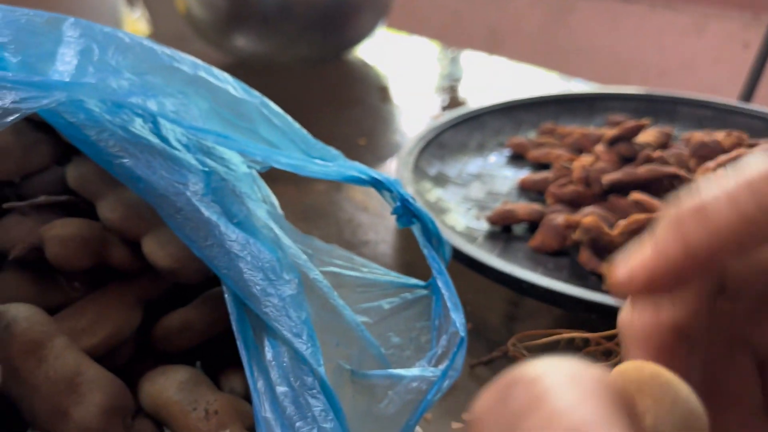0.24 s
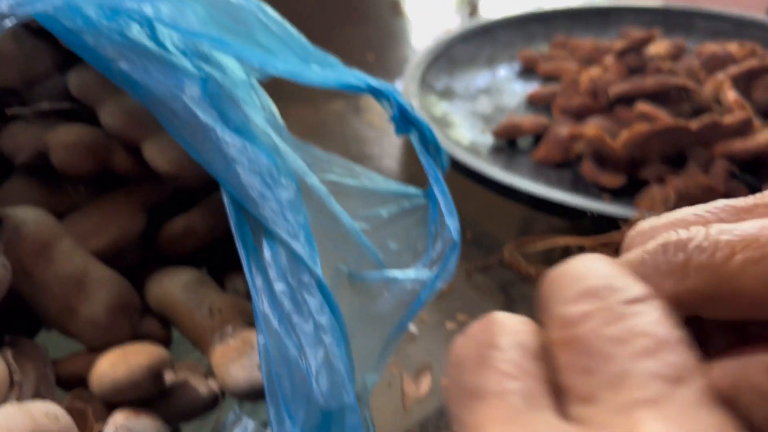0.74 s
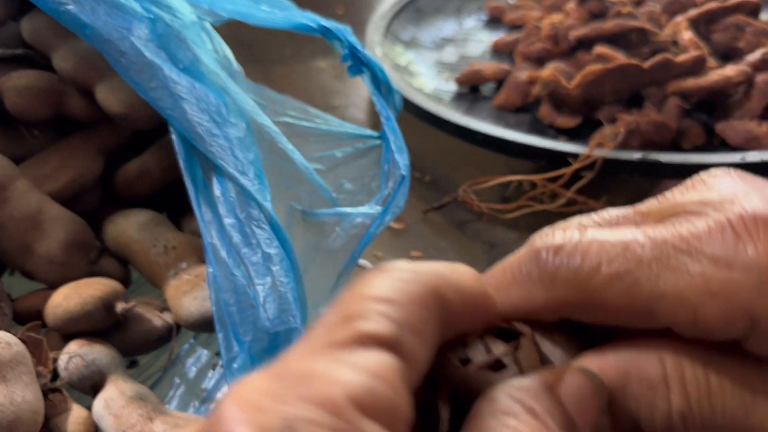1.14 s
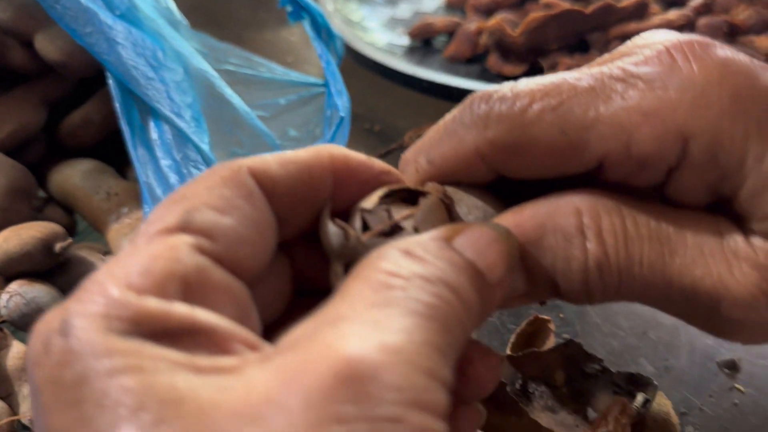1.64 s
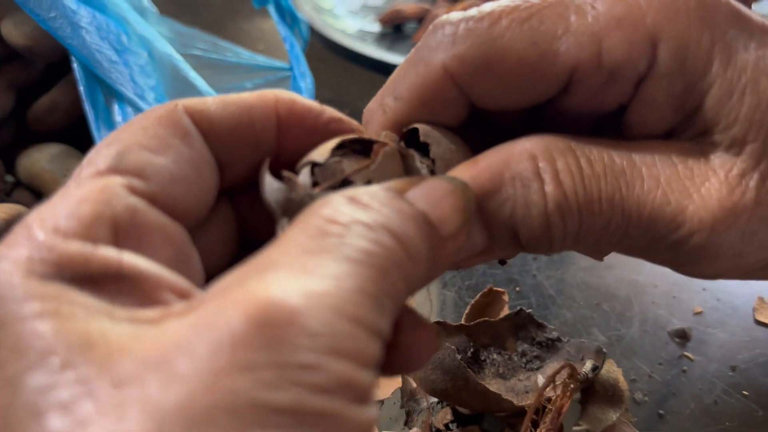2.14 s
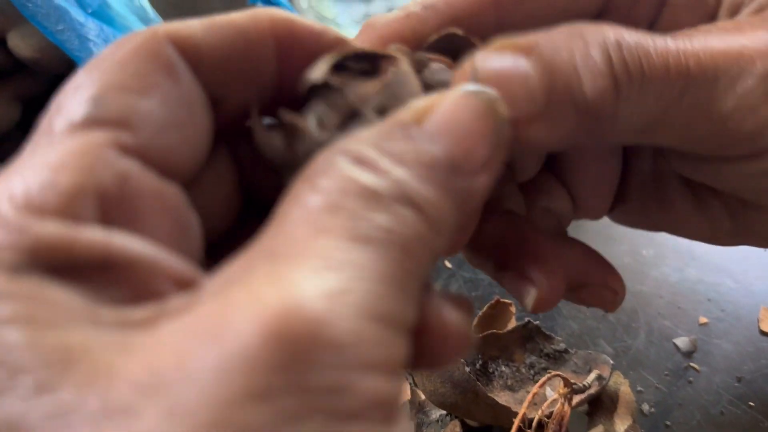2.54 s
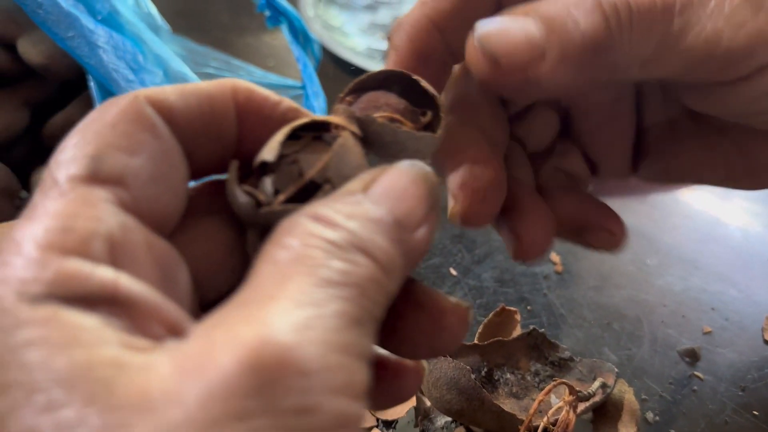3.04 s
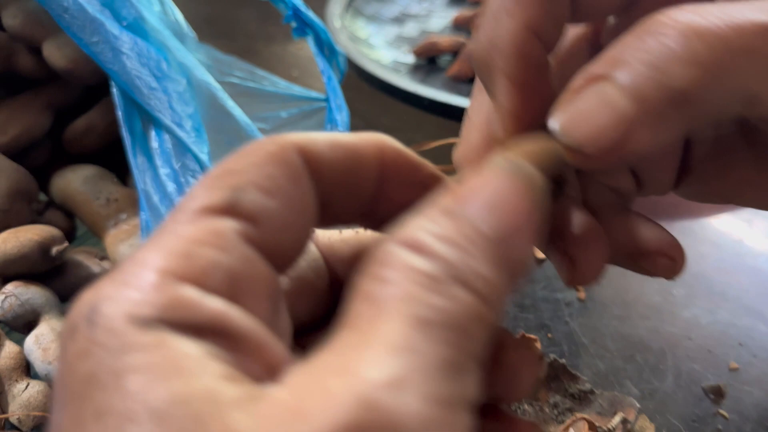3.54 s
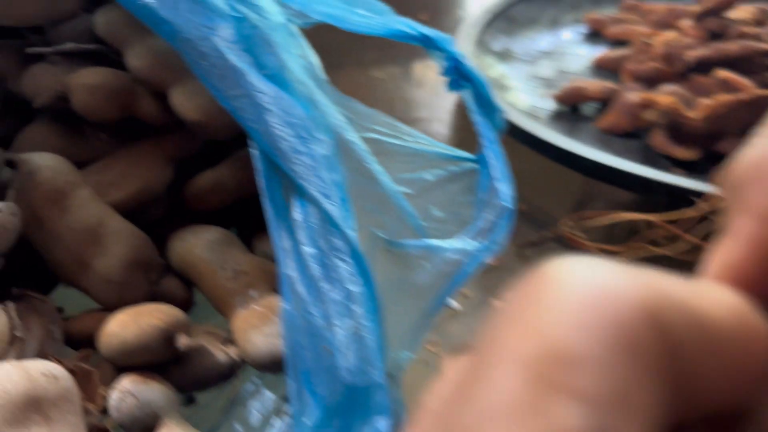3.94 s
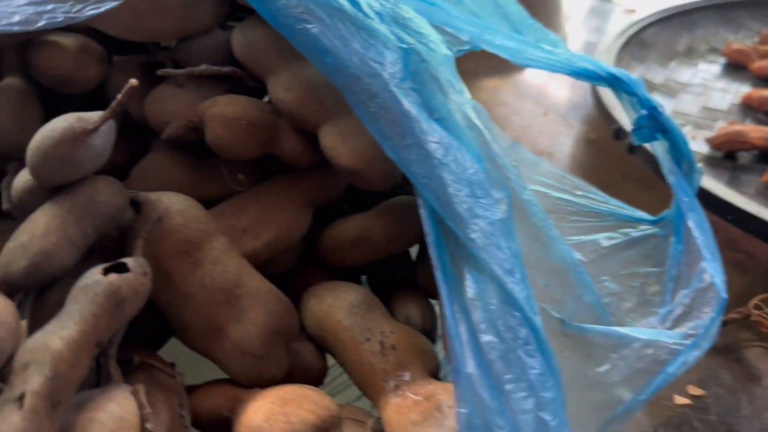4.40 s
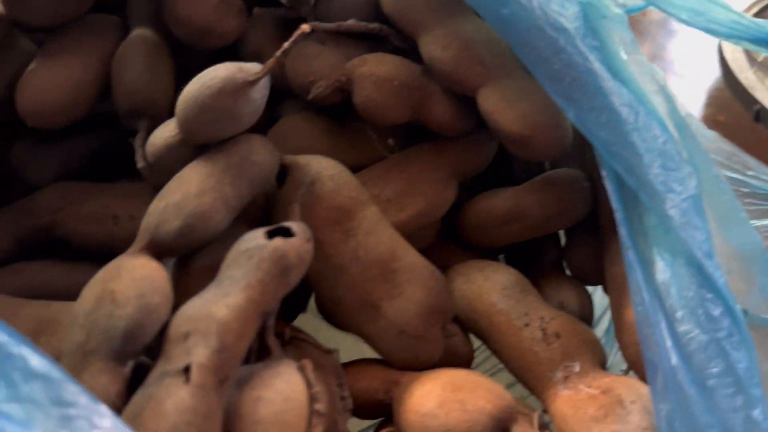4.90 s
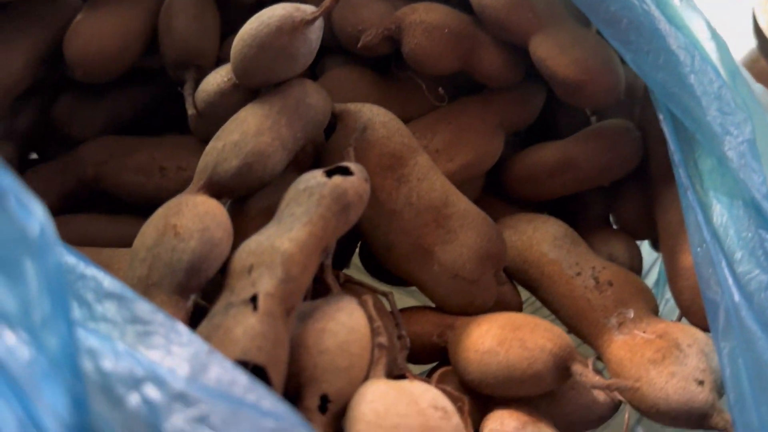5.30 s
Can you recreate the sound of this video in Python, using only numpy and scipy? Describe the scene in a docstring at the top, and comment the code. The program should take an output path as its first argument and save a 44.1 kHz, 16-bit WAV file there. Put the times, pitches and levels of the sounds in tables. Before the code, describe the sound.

Brittle dry pod shells crack and snap very close up, with fingers rubbing and crumbling bits, while distant traffic rumble slowly grows.

```python
"""Brittle dry pod shells crack and peel close to a two-port microphone: treble bursts, crunch noise and
ringing pieces, answered by a small hard room of decaying diffuse noise. Fingers rub in ticks and hiss.
Outside, traffic draws nearer: two engine drones beat over shaped-noise rumble and tyre roar.
Brief low moans and a steady far hiss lie behind."""
import sys
import numpy as np
from scipy import signal
from scipy.fft import rfft, irfft, next_fast_len
from scipy.io import wavfile
from scipy.ndimage import uniform_filter1d, map_coordinates

SR = 44100
rng = np.random.default_rng(int(sys.argv[2]) if len(sys.argv) > 2 else 0)


def wav_record(signal):
    """Record a signal, one row per channel, as 16-bit PCM in the file named by sys.argv[1]."""
    frames = np.transpose(np.atleast_2d(signal))
    bounded = np.clip(frames, -1, 1)
    # unit amplitude maps onto the largest positive 16-bit level
    quanta = np.round(bounded * 32767).astype(np.int16)
    wavfile.write(sys.argv[1], SR, quanta)


N = 245180

# Fractures: t/s, snap level/dB before trim, ring level/dB, piece f/Hz, crunch level/dB re ring, room level/dB
CRACKS = [(0.017, -65, -37.5, 4100, -7, -11), (0.0769, -38.5, -34, 4190, 0, -14),
          (0.085, -54, -33, 6200, -12, -16), (0.097, -54, -42, 4900, -13, -14),
          (0.194, -60, -35.5, 5840, -9, -11), (0.2547, -41.5, -35, 5600, -11, -6),
          (0.277, -57, -39, 5120, -5, -22), (0.301, -56, -56, 7500, -10, -9),
          (0.3737, -37.5, -27.5, 4980, -23, -11), (0.38, -48, -29, 6570, -23, -3.5),
          (0.4163, -38, -35, 6000, -17, -22), (0.841, -18.5, -23.5, 6620, -1, -11.5),
          (0.857, -39, -37, 5350, -4, -28), (0.883, -55, -34, 1860, -8, -8),
          (0.891, -31, -38.5, 4800, 10.5, -39), (0.9172, -24, -15.5, 6300, -19.5, -9),
          (0.924, -45, -28, 4840, -18, -25), (1.0329, -30, -21, 4314, -6.5, -16),
          (1.04, -54, -35, 1630, -1, -13), (1.1152, -29.5, -25.5, 6370, -32, -9),
          (1.1615, -28.5, -29.5, 7160, -13, -6.5), (1.164, -16.5, -24.5, 6130, -33, -33),
          (1.2392, -27.5, -25, 6630, -11, -11.5), (1.27, -35, -46.5, 2780, -5, -20),
          (1.274, -34, -41.5, 6310, -2, -15), (1.2963, -19, -39, 3840, 2.5, -18),
          (1.3267, -45, -48.5, 3680, -11.5, 6), (1.49, -58, -57, 5870, -7, -4),
          (1.7815, -23.5, -25.5, 4020, 0, -27), (1.7898, -49, -28.5, 1910, -23, 3.5),
          (1.7971, -22, -42, 3700, -14, -30), (1.7998, -15.5, -10, 2390, -28, -4),
          (2.053, -40, -44.5, 2525, 1.5, -13), (2.0802, -33, -32, 6400, -18, -4),
          (2.095, -39, -39, 6300, -16, -22), (2.161, -46, -33.5, 6250, -8, -15),
          (2.2007, -33.5, -21.5, 2480, -10, -16), (2.2228, -34, -23.5, 6400, -13.5, -9.5),
          (2.2862, -23, -15.5, 2455, -16, -13), (2.323, -22, -25.5, 5990, -19, -16),
          (2.3304, -31, -33, 2380, -16, -21), (2.339, -43, -42, 6160, -5, -17),
          (2.3624, -24, -29, 1070, -4.5, -17), (2.4712, -35, -35.5, 2380, -9, -12),
          (2.491, -33.5, -37, 2670, -23, 7), (2.4918, -40, -35, 2330, -7, -1.5),
          (2.501, -45, -35, 2588, -23, 2), (2.5187, -32, -30, 2540, -19, 3),
          (2.532, -36, -33, 3180, -14, 1), (2.5408, -26, -39.5, 4130, 9.5, -16),
          (2.544, -28, -25.5, 3530, -21, -30), (2.55, -15, -11, 4063, -20.5, -8.5),
          (2.5476, -17.5, -25, 3830, -12.5, -12), (2.5539, -30.5, -22.5, 3870, 3, -26),
          (2.813, -49, -52, 6520, -1, -21), (2.846, -19.5, -15, 7300, -14.5, -6),
          (2.8511, -7, -13, 5500, -8.5, -24), (2.9301, -30, -36, 7370, -5, -10),
          (3.02, -52.5, -59, 6000, -3, -21), (3.043, -59.5, -59, 6000, 0, -15),
          (3.117, -47, -45, 5500, 4, -29), (3.361, -53, -62, 4330, 0, 14),
          (3.375, -40.5, -40, 5470, 0.5, -16), (3.3863, -45, -34, 5640, -11, -35),
          (3.456, -50, -51, 4500, -3, -5), (3.4754, -41, -44, 5850, -3, -13),
          (3.4928, -42, -37.5, 5650, 1, -14), (3.5341, -24.5, -34.5, 5430, -12, -10),
          (3.538, -32, -26, 5960, -35, -2.5), (3.683, -49.5, -42.5, 5460, -11.5, -1.5),
          (3.8586, -40, -32, 6000, -5, -13.5), (3.8723, -55.5, -39, 2110, -16, -21),
          (3.9023, -36, -39, 5210, -6, -21), (3.968, -41, -37, 4200, 2, -20),
          (4.026, -45, -49, 6670, -16, -7), (4.0728, -39.5, -27.5, 2120, -8, -17.5),
          (4.133, -48.5, -52, 4870, 0.5, 4.5), (4.152, -48, -48, 5500, -8, -2),
          (4.264, -61.5, -43, 4750, -9, -5.5), (4.2886, -31.5, -30.5, 2500, -8, -7),
          (4.297, -44, -31, 4627, -7, -14), (4.308, -46, -28.5, 1297, -28, -4),
          (4.31, -56, -29, 546, -13, -7), (4.35, -38, -42, 2570, -25, -8),
          (4.3914, -25.5, -22, 2335, -7, -16), (4.603, -46, -46.5, 5560, -5.5, -4),
          (4.764, -69, -30, 6030, -10, -10), (4.7697, -22.5, -15.5, 5350, 1, -11),
          (4.7744, -52.5, -25, 2630, -5, -11), (4.776, -56, -28.5, 1140, 1.5, -10),
          (4.786, -59, -41, 5540, -1, -14), (4.8881, -34.5, -36.5, 5880, -19, -3),
          (4.979, -67, -41, 4130, -6, -10), (5.005, -71, -36, 3851, -21, -1),
          (5.133, -70, -42.5, 4500, -8, -4), (5.279, -49.5, -45.5, 5080, -3, -5.5)]
# Snap spectrum, relative density: f/Hz, level/dB
SNAP_SPECTRUM = [(4000, -38), (6500, -9), (8500, 9), (11000, 13), (13500, 12), (15500, 14), (16300, -16),
                 (17000, -39.5)]
# Crunch and crumbling spectrum, relative density: f/Hz, level/dB
CRUNCH_SPECTRUM = [(250, -46), (500, -15), (1200, -4.5), (2400, 0.5), (3200, -5), (4500, 0.5), (6300, 0.5),
                   (8000, -14.5), (10000, -27.5)]
# Shell left in the hand, rings along: nominal f/Hz, nominal level/dB re piece
SHELL_MODES = [(2450, -18), (3600, -26), (4300, -13.5), (5300, -16), (6300, -18)]
# Room decay: f/Hz, t60/s
ROOM_T60 = [(800, 0.43), (2500, 0.41), (5000, 0.33), (10000, 0.21), (15700, 0.16), (16300, 0.024)]
# Handling of the shell: t/s, base level/dB
RUBBING = [(0.0, -75), (0.43, -56), (0.6, -73.5), (0.79, -62.5), (0.86, -48), (0.99, -51), (1.07, -59),
           (1.34, -61), (1.47, -82), (2.0, -68.5), (2.24, -69), (2.5, -61), (2.8, -64.5), (3.08, -67),
           (3.33, -59), (3.38, -70), (3.43, -65), (3.56, -57), (3.84, -63.5), (4.26, -71.5), (4.6, -74),
           (4.94, -65), (5.15, -71.5), (5.56, -70)]
# Skin tick and hiss spectrum, relative density: f/Hz, level/dB
SKIN_SPECTRUM = [(1500, -17), (3000, -7.5), (6000, 9), (8500, -1), (11000, -5), (13300, -9.5), (15800, 1.5),
                 (16100, -36.5), (16500, -120)]
# Higher engine drone: t/s, f/Hz, mean level/dB
DRONE_HIGH = [(0.0, 63.56, -71), (0.8, 65.4, -59.5), (1.5, 66.48, -46), (2.3, 65.5, -45.5),
              (2.8, 65.83, -66), (3.6, 65.5, -46.5), (4.3, 64.3, -46.5), (4.8, 64.3, -36),
              (5.15, 62.8, -37), (5.56, 64.07, -58)]
# Lower engine drone: t/s, f/Hz, mean level/dB
DRONE_LOW = [(0.0, 55.54, -60.5), (0.8, 55.78, -58), (1.5, 59.5, -56.5), (2.1, 60.5, -67), (2.8, 59.9, -45),
             (3.5, 56.5, -50), (4.3, 54.07, -56), (4.75, 55.18, -38.5), (5.15, 53, -42), (5.56, 52.5, -35)]
# Traffic approach: t/s, base level/dB
NEARNESS = [(0.0, -58.5), (1.4, -57.5), (2.8, -55.5), (4.35, -50.5), (4.75, -49), (5.56, -48)]
# Road rumble spectrum, relative density: f/Hz, level/dB
RUMBLE_SPECTRUM = [(12, -39.5), (20, -15), (36, -23), (59, 2), (77, -11.5), (92, -15), (124, -19),
                   (176, -21.5), (218, -16), (312, -20), (600, -66), (780, -59.5), (1320, -120)]
# Tyre roar spectrum, relative density: f/Hz, level/dB
TYRE_SPECTRUM = [(260, 3), (450, -0.5), (497, -4), (1560, -3.5), (3560, -20), (4410, -24), (5180, -33.5),
                 (6030, -28), (9000, -50), (11700, -61), (19800, -120)]
# Brief low tones: t/s, length/s, f/Hz, level/dB
MOANS = [(0.91, 0.3, 149.3, -53.5), (1.226, .14, 153, -54.5)]
# Far hiss spectrum, relative density: f/Hz, level/dB
AIR_SPECTRUM = [(1500, -10), (2500, 5), (3500, 2), (5000, -5), (8000, -8), (9000, -14), (15800, -41),
                (16100, -57), (16500, -120)]
# Diffuse noise, left-right likeness: f/Hz, correlation/1
LIKENESS = [(60, 0.66), (150, 1), (380, 0.32), (950, -0.025), (2380, -0.26), (5980, -0.2), (15000, 0.2)]
# Diffuse noise, left over right: f/Hz, level/dB
BALANCE = [(60, 0.5), (150, 3), (380, -2.5), (950, -6), (2380, -3.5), (5980, -2), (15000, 2)]
# Phase lag of the right channel's treble: f/Hz, phase/rad
TREBLE_LAG = [(8300, 3.7), (8900, 3.3), (11000, 2 * np.pi), (13200, 3 * np.pi), (15700, 4 * np.pi),
              (17000, 4 * np.pi)]

SNAP_TRIM_DB = -1.0
RING_T60_S, PITCH_DECAY_POWER = 0.014, 0.27  # t60 at 4 kHz; shortens with this power of pitch
RING_PAN_DB, PAN_SCATTER_DB = -6, 3  # left over right; its scatter
SKIN_DB, CRUMBLING_DB = -8, -9.5  # re base rubbing level
RUMBLE_DB, TYRES_DB = 5.0, 0  # re base traffic level
OCTAVE_OPENS_S, OCTAVE_RAMP_S = 3.22, 0.47
AIR_DB = -72.5
ONE_PORT_HZ, TOP_HZ = 8300, 17050  # above the first, one port feeds both channels; above the second, nothing


def amp(db):
    """Amplitude from dB."""
    return 10 ** (np.asarray(db) / 20)


def unit(x):
    """x scaled to rms 1."""
    return x / np.sqrt(np.mean(x ** 2) + 1e-20)


def along(points, hz):
    """Values of (f/Hz, value) points, interpolated on a log frequency axis."""
    f, value = np.transpose(points)
    return np.interp(np.log(hz + 1), np.log(f + 1), value)


def curves(rows):
    """One value per sample for each column after the time."""
    s, *columns = np.transpose(rows)
    return [np.interp(np.arange(N) / SR, s, c) for c in columns]


def wobble(rate_hz):
    """Smooth random curve, rate_hz knots a second."""
    knots = rng.standard_normal(int(N * rate_hz / SR) + 4)
    return map_coordinates(knots, [np.arange(N) * rate_hz / SR])


def filtered(x, response):
    """x shaped by a response of frequency."""
    n = x.shape[-1]
    m = next_fast_len(n + 4096)
    return irfft(rfft(x, m) * response(np.fft.rfftfreq(m, 1 / SR)), m)[..., :n]


def coloured(x, spectrum):
    """x shaped by a spectrum table."""
    return filtered(x, lambda hz: amp(along(spectrum, hz)))


def cracks(wall_delay_s=0.0036):
    """Fracture: a millisecond treble burst, then crunch and ringing pieces, then the room's answer."""
    out = np.zeros((2, N + SR))
    t = np.arange(SR // 20) / SR - .003
    # fibres give way just before the main burst
    burst = np.exp(-(t / .0005) ** 2) + .1 * np.exp(-abs(t) / np.where(t < 0, .001, .002))
    late_s = np.clip(t + .0003, 0, None)
    click = np.arange(len(t)) == np.argmax(burst)
    bright, dull = (unit(coloured(click, c)) / np.sqrt(len(t)) for c in (SNAP_SPECTRUM, CRUNCH_SPECTRUM))
    for s, snap_db, ring_db, hz, crunch_db, room_db in CRACKS:
        pan_db = RING_PAN_DB + PAN_SCATTER_DB * rng.standard_normal()
        grit = unit(coloured(rng.standard_normal(len(t)), SNAP_SPECTRUM))
        snap = amp(snap_db + SNAP_TRIM_DB) * grit * burst

        t60_s = RING_T60_S / (hz / 4000) ** PITCH_DECAY_POWER
        swell = (1 - np.exp(-late_s / 0.00048)) * amp(-60 * late_s / t60_s)
        swell = swell * amp(ring_db + pan_db * np.array([[.5], [-.5]]))
        noise = rng.standard_normal(len(t)) + 4.8 * rng.standard_normal((2, len(t)))  # common + per port
        crunch = swell * amp(crunch_db) * unit(coloured(noise, CRUNCH_SPECTRUM))
        ring = shell_ring(hz, late_s, swell)

        # the room gathers all directions: smoother colour than at the near ports
        spread = amp(-2) * np.linalg.norm(snap) * bright
        spread = spread + amp(3) * np.linalg.norm(crunch) * dull
        spread = spread + amp(-5) * ring.mean(0)
        wet = amp(room_db) * signal.fftconvolve(spread[None], room_tail(), axes=1) * amp([[-1.5], [1.5]])

        near = snap + crunch + ring
        # the split runs on in smaller steps
        for delay_s, size_db in rng.uniform([.001, -30], [.015, -18], (3, 2)):
            near = near + amp(size_db) * np.roll(snap + crunch, round(delay_s * SR), axis=1)
        at = round((s + t[0]) * SR) + 15
        out[:, at:at + len(t)] += near
        out[:, at + round(wall_delay_s * SR):][:, :wet.shape[1]] += wet
    return out[:, :N]


def shell_ring(hz, late_s, swell, rough=0.41, lead_rad=1.0):
    """Freed piece and remaining shell ring as decaying sines whose phase drifts randomly."""
    ring = np.zeros_like(swell)
    shell = [(f * rng.normal(1, 0.047), db + rng.normal(0, 1)) for f, db in SHELL_MODES]
    for f0, db in [(hz, 0)] + shell:
        # tearing blurs the pitch, small pieces most
        steps = rng.standard_normal(len(late_s))
        drift = rough * np.cumsum(steps) * f0 / 2500 * np.sqrt(f0 / SR)
        # the pieces lie nearer the right port
        sooner = np.array([[0], [lead_rad + 0.77 * rng.standard_normal()]]) * min(f0 / 2500, 1)
        ring += swell * amp(db) * np.sin(2 * np.pi * f0 * late_s + drift + sooner)
    # small pieces radiate no bass
    corner_hz = 1.4 * min(hz, SHELL_MODES[0][0])
    return filtered(ring, lambda f: np.clip(f / corner_hz, 0, 1) ** 2)


def room_tail():
    """Fresh diffuse noise tail per port; each frequency dies at its own speed."""
    hz, t, z = signal.stft(rng.standard_normal((2, SR // 3)), SR, nperseg=128)
    lumps = amp(2.2 * rng.standard_normal(len(t)))  # single walls and objects stand out of the blur
    decay = amp(-60 * t / along(ROOM_T60, hz)[:, None])
    tail = signal.istft(z * lumps * decay, SR, nperseg=128)[1]
    return tail / np.linalg.norm(tail[0])


def rubbing(hiss_db=-5):
    """Fingers slide on shell in bright ticks and soft hiss; bent shell crumbles in duller grains."""
    rub_db, = curves(RUBBING)
    hiss = rush(SKIN_SPECTRUM, patchy_db=2)
    skin = ticks(per_s=2700, spread_db=2.5, life_s=.0003, spectrum=SKIN_SPECTRUM) + amp(hiss_db) * hiss
    grains = ticks(per_s=800, spread_db=9.0, life_s=0.0014, spectrum=CRUNCH_SPECTRUM)
    crumbling = grains * amp([[-2.5], [2.5]])
    uneven_db = 3 * wobble(8)  # the grip slips and catches
    return amp(rub_db + SKIN_DB + uneven_db) * skin + amp(rub_db + CRUMBLING_DB) * crumbling


def ticks(per_s, spread_db, life_s, spectrum):
    """Tiny decaying noise ticks of uneven size; a wandering rate clumps them, rms 1."""
    chance = per_s / SR * amp(7.1 * wobble(25))
    sizes = amp(spread_db * np.minimum(rng.exponential(size=N), 4)) * rng.standard_normal(N)
    hits = (rng.uniform(size=N) < chance) * sizes
    t = np.arange(SR // 100) / SR
    grain = rng.standard_normal(len(t)) * np.exp(-t / life_s)
    return unit(coloured(signal.fftconvolve(hits, grain)[:N], spectrum))


def rush(spectrum, patchy_db):
    """Diffuse stereo noise with patches of random gain, rms 1 in the middle."""
    z = signal.stft(rng.standard_normal((2, N)), nperseg=512)[2]
    field = uniform_filter1d(rng.standard_normal(z.shape[1:]), size=6, axis=0)
    field = uniform_filter1d(field, size=14, axis=1)
    pair = signal.istft(z * amp(patchy_db * unit(field)), nperseg=512)[1][:, :N]

    def mid_side(hz):
        turn = np.arccos(np.clip(along(LIKENESS, hz), -1, 1)) / 2
        return amp(along(spectrum, hz)) * [np.cos(turn), np.sin(turn)]

    mid, side = filtered(pair, mid_side)
    both = np.array([mid + side, mid - side])
    both = filtered(both, lambda hz: amp(along(BALANCE, hz) * [[.5], [-.5]]))
    return both / np.std(both.mean(0))


def traffic():
    """Engine drones several hertz apart throb against each other over rising rumble and tyre roar."""
    near_db, = curves(NEARNESS)
    drones = drone(DRONE_HIGH, unsteady_db=3, octave_db=-36) + drone(DRONE_LOW, unsteady_db=5, octave_db=-43)
    rumble = amp(near_db + RUMBLE_DB) * rush(RUMBLE_SPECTRUM, patchy_db=0.5)
    tyres = amp(near_db + TYRES_DB) * rush(TYRE_SPECTRUM, patchy_db=1.6)
    return drones + rumble + tyres


def drone(rows, unsteady_db, octave_db):
    """Engine firing note and its octave, which comes forward as the engines near."""
    hz, db = curves(rows)
    db = db + unsteady_db * np.tanh(wobble(5))
    opening = np.clip((np.arange(N) / SR - OCTAVE_OPENS_S) / OCTAVE_RAMP_S, .15, 1)
    return tone(hz, db) + opening * tone(2 * hz, octave_db + db / 2)


def tone(hz, db):
    """Low sine of given rms level, nearly in phase at both ports."""
    phase = 2 * np.pi * np.cumsum(hz * np.ones(N)) / SR
    return np.sqrt(2) * amp(db) * np.sin(phase + np.array([[.2], [-.2]]))


def moans():
    """Short soft sines that swell and fade."""
    t = np.arange(N) / SR
    out = np.zeros((2, N))
    for s, length_s, hz, db in MOANS:
        swell = np.sin(np.pi * np.clip((t - s) / length_s, 0, 1)) ** 0.2
        out += swell * tone(hz, db)
    return out


def air():
    """Steady far hiss of diffuse shaped noise."""
    return amp(AIR_DB) * rush(AIR_SPECTRUM, patchy_db=1.2)


def scene():
    """Sum of all sources at the two ports."""
    return cracks() + rubbing() + traffic() + moans() + air()


def record(dry):
    """One port feeds both channels' treble, phase-turned on the right; soft ceiling, then band limit."""
    def share(hz):
        return np.clip((hz - ONE_PORT_HZ) / 600 + .5, 0, 1)

    right = filtered(dry[1], lambda hz: 1 - share(hz))
    right += filtered(dry[0], lambda hz: amp(0.86) * share(hz) * np.exp(-1j * along(TREBLE_LAG, hz)))
    both = np.array([dry[0], right])
    both = both / (1 + abs(both / .9) ** 6) ** (1 / 6)  # the loudest snaps reach the converter's ceiling
    return filtered(both, lambda hz: np.clip((TOP_HZ - hz) / 500, 0, 1) ** 2)


dry = scene()
out = record(dry)
wav_record(out)
```